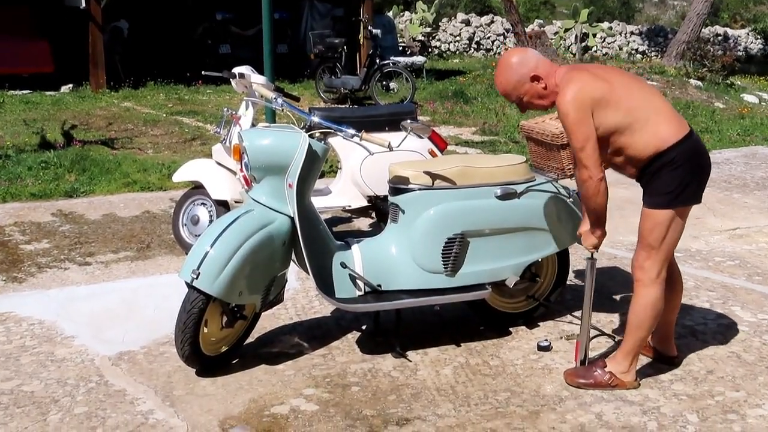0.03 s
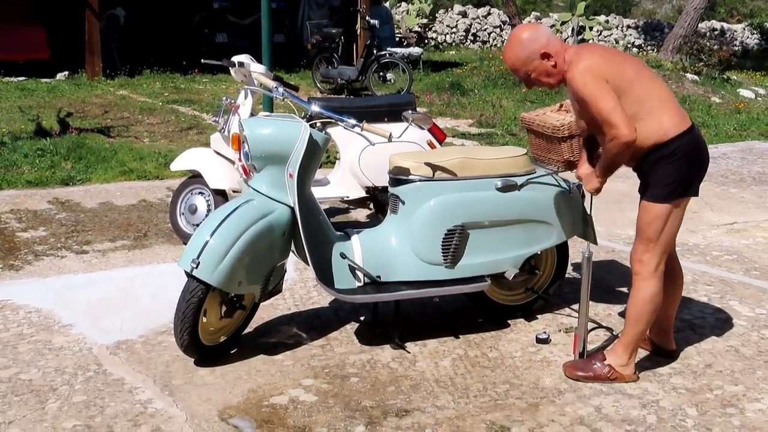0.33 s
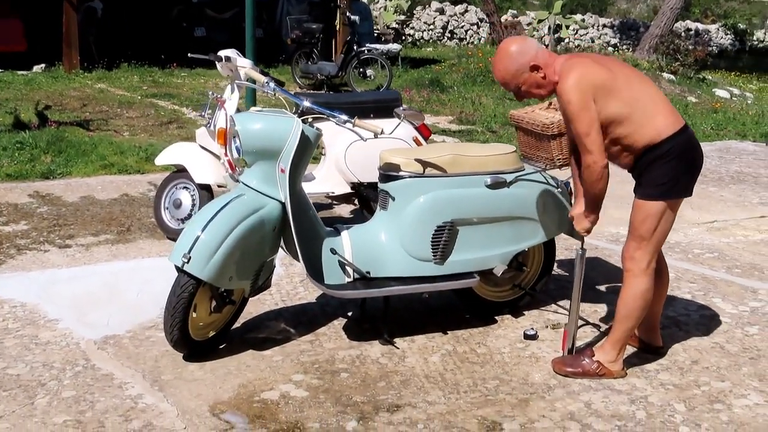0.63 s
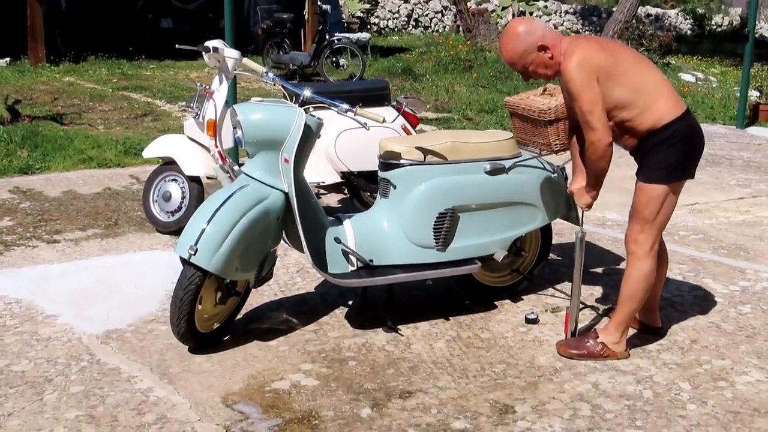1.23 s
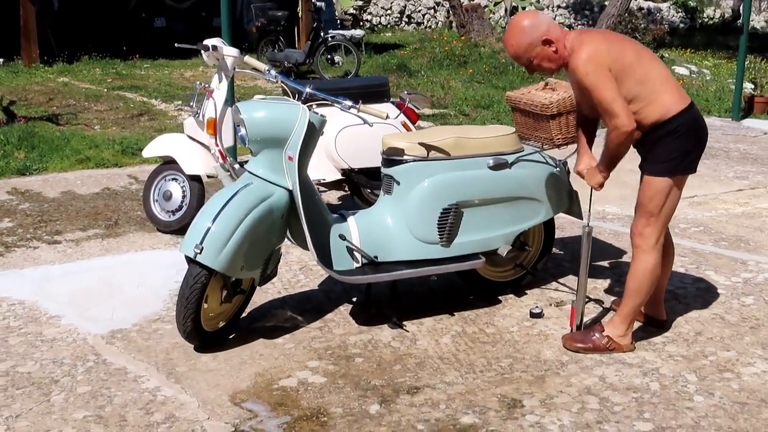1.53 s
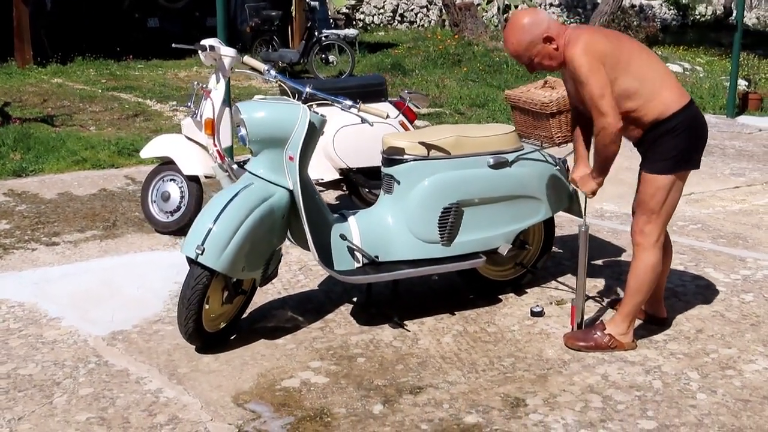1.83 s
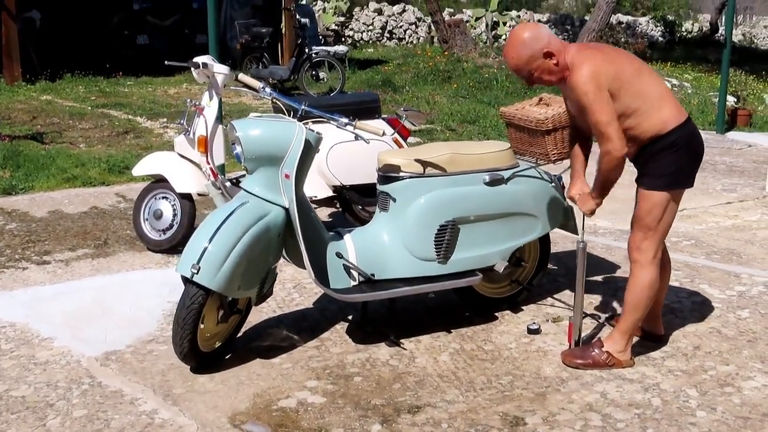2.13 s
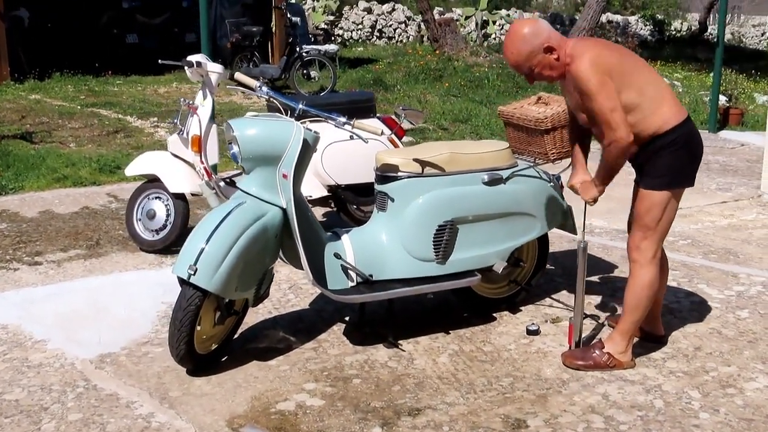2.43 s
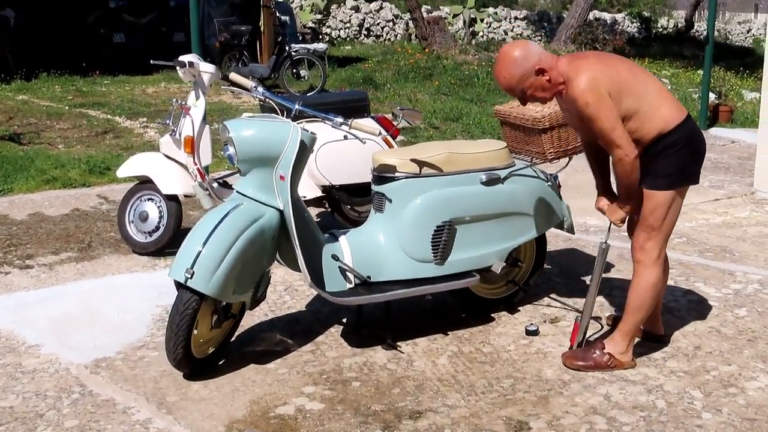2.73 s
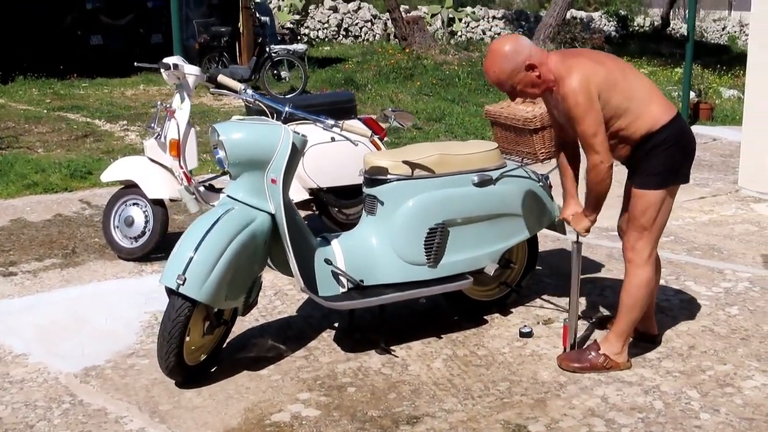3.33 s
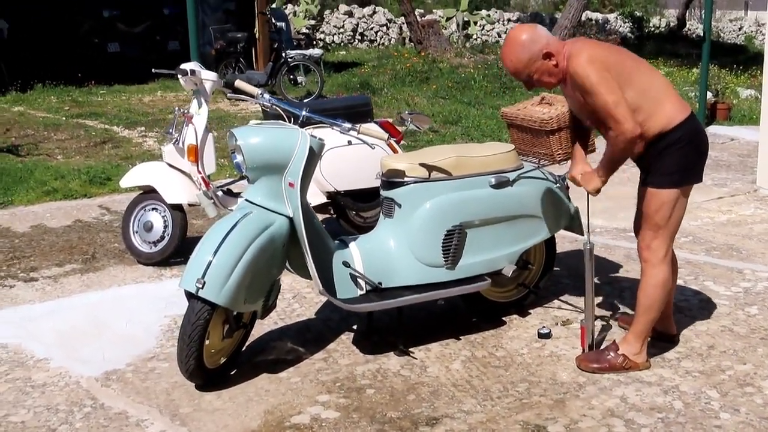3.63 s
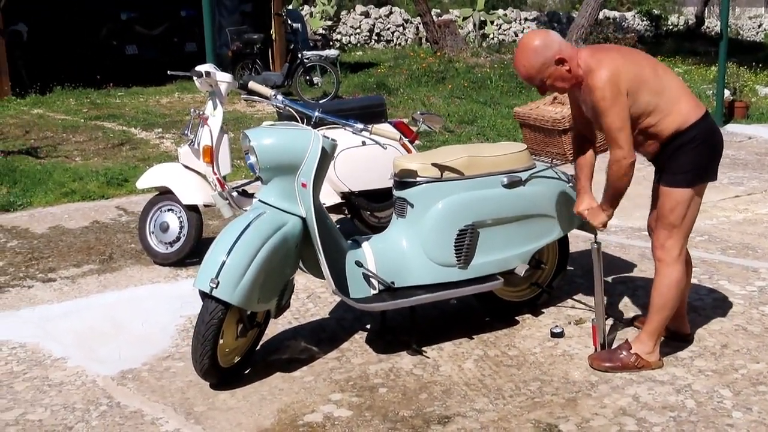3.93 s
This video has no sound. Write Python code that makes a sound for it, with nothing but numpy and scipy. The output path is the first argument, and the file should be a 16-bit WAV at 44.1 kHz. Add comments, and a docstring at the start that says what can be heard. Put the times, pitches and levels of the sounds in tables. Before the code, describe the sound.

A hand pump inflates a scooter tyre in a steady rhythm. Each push hisses with a thin whistle, and each pull sucks and rasps, with squeaks and knocks between. Light wind brushes the microphone in an open yard.

```python
"""An open yard: a floor pump inflates a scooter tyre at about one and a half strokes a second.
As the handle sinks, air is forced out with a hiss and a thin wavering whistle, and a bright spurt ends
the push. As it rises, air rushes in and the rod rasps. The washer chirps and squeaks on the barrel wall,
and the loose rod knocks at the turns. Light wind buffets the microphone over a faint outdoor hiss."""
import sys
import numpy as np
from scipy import signal
from scipy.fft import rfft, irfft
from scipy.io import wavfile
from scipy.ndimage import uniform_filter1d

SR = 44100
rng = np.random.default_rng(int(sys.argv[2]) if len(sys.argv) > 2 else 0)


def output_pcm(signal):
    """Save a mono or channel-first signal as 16-bit PCM at the path in sys.argv[1].

    Samples are clipped to [-1, 1] before scaling.
    """
    pcm = np.clip(np.atleast_2d(signal).T, -1, 1) * 32767
    wavfile.write(sys.argv[1], SR, np.round(pcm).astype(np.int16))


N = 176400
TIME = np.arange(N) / SR
FREQS = np.maximum(np.fft.rfftfreq(N, 1 / SR), 1)

# Handle sinks: t/s at start, fastest, end; rush level/dB at each; hiss level/dB; whistle re rush/dB
DOWNSTROKES = [(-.05, 0.03, 0.14, -39, -34, -40, -41, -6), (0.57, 0.743, 0.76, -37, -37, -32, -42, -8.5),
               (1.159, 1.268, 1.367, -42.5, -34.5, -34, -43.5, -12),
               (1.777, 1.92, 2.09, -35.5, -27.5, -51.5, -43, -18),
               (2.445, 2.55, 2.657, -31.5, -29.5, -40, -38.5, -22),
               (3.051, 3.147, 3.38, -36.5, -32.5, -53, -43, -11),
               (3.659, 3.777, 3.83, -34, -35, -39, -49.5, -2.5)]
# Handle rises: t/s at start, fastest, end; rush level/dB at each; rasp level/dB
UPSTROKES = [(0.305, 0.418, 0.46, -41, -32, -40.5, -40.5), (0.916, 1.029, 1.033, -37, -34, -28.5, -44.5),
             (1.551, 1.591, 1.665, -37, -31.5, -32.5, -47), (2.158, 2.264, 2.36, -39.5, -34, -60, -40.5),
             (2.77, 2.848, 2.956, -48, -31.5, -37.5, -55), (3.465, 3.524, 3.63, -30.5, -30.5, -44, -44.5)]
# Short jets at the valve: t/s, length/s (held for half of it), level/dB
VALVE_SPURTS = [(0.167, 0.02, -32), (0.787, 0.042, -34), (1.366, 0.17, -39.5), (1.681, 0.032, -34),
                (1.904, 0.046, -35), (2.051, 0.042, -35.5), (2.402, 0.05, -37), (2.66, 0.026, -33.5),
                (2.928, 0.019, -34.5), (3.017, .02, -38), (3.284, 0.036, -33), (3.882, 0.018, -36.5)]
# Clear squeaks of the washer: t/s, length/s, start f/Hz, end f/Hz, level/dB
WASHER_SQUEAKS = [(1.248, 0.026, 2736, 3550, -35), (1.549, 0.017, 3200, 2480, -32),
                  (1.844, 0.014, 3130, 3400, -27), (1.9, 0.028, 2410, 2290, -27),
                  (1.924, 0.067, 3010, 2920, -33.5), (1.976, 0.078, 3450, 3430, -43),
                  (2.515, .022, 2920, 3490, -32), (2.827, 0.029, 3150, 2750, -27.5),
                  (3.111, 0.027, 2760, 3610, -28.5), (3.139, 0.031, 2904, 3275, -28.5),
                  (3.657, 0.042, 2826, 3410, -29.5), (3.714, 0.017, 3050, 3520, -35)]
# Rod hits the barrel: t/s, dry rms level/dB over the first 10 ms, low ring gain/dB, top ring gain/dB
ROD_KNOCKS = [(.231, -27.5, 6.5, 3), (.567, -29.5, -4, 1), (0.867, -29, 7.5, 1), (0.919, -26, -5, 0),
              (1.162, -35, 4, -7), (1.4086, -22, -5, -6), (1.4139, -21, -5, 2), (1.422, -27, 4, 10.5),
              (1.498, -33.5, 5.5, -5), (1.776, -33, -2, -8), (2.051, -28, 4.5, -2),
              (2.147, -27.5, 2.5, 9.5), (2.49, -22.5, -8, -17), (3.295, -19.5, 0, 0.5),
              (3.355, -23, 0.5, 5), (3.471, -27.5, 2.5, 3)]
# The whole pump jolts: t/s, level/dB
PUMP_JOLTS = [(3.284, -33), (3.354, -41)]
# Ringing modes of barrel and rod: f/Hz, level/dB, t60/s
BARREL_MODES = [(467, -19, 0.04), (618, -17, 0.038), (1013, -17, 0.018), (1506, -10.5, 0.028),
                (2383, -4.5, 0.011), (2970, -6.5, 0.0081), (3290, -6, 0.011), (4150, -7.5, 0.0068),
                (4990, -17.5, 0.0095), (6420, -14.5, 0.0035)]
# Narrow resonances of the pump tube: f/Hz
TUBE_RESONANCES = [2180, 2374, 3880, 6330, 6710]
# Wind puffs on the microphone: t/s, length/s, level/dB
WIND_PUFFS = [(1.767, 0.12, -32.5), (1.866, 0.011, -29), (3.115, 0.011, -42), (3.678, 0.0092, -24.5),
              (3.911, 0.011, -23.5)]
# Rise and fall of the wind rumble: t/s, level/dB
BREEZE_LEVELS = [(0, -52.5), (.42, -46.5), (.68, -70), (.95, -46), (1.25, -61), (1.55, -51), (2.5, -53),
                 (2.78, -59.5), (3.1, -47.5), (3.3, -50.5), (4, -43)]

# Colour of the downstroke rush: f/Hz, level/dB
PUSH_COLOUR = [(200, -26), (600, -17), (1300, -10.5), (1750, -6.5), (2250, -3), (2650, -6), (3000, 0.5),
               (3500, -6), (3900, -5), (5500, -12), (15000, -27.5)]
# Hollow colour of the intake: f/Hz, level/dB
PULL_COLOUR = [(250, -19.5), (800, -19), (1080, -1.5), (1300, -16), (1530, -5), (2200, -2), (2600, -3),
               (3200, 1), (3650, -7), (4350, -4.5), (7500, -17.5), (15000, -30.5)]
# Peaky colour of the hose hiss: f/Hz, level/dB
HOSE_COLOUR = [(1500, -4), (4500, -13), (5800, 1), (6500, 16.5), (7300, -12), (8300, -9), (9700, 6),
               (12000, -10), (14500, 0), (16000, -25)]
# Bright colour of valve jets and rod rasp: f/Hz, level/dB
BRIGHT_COLOUR = [(400, 2.5), (1500, 7), (3300, 4), (6300, 12.5), (7500, 0.5), (9800, 6.5), (12000, 0.5),
                 (15000, -1)]
# Deep colour of the wind rumble: f/Hz, level/dB
RUMBLE_COLOUR = [(20, -31), (55, -3), (130, 1.5), (300, -12), (1500, -53)]
# Dull colour of the wind puffs: f/Hz, level/dB
PUFF_COLOUR = [(20, -24), (160, 2.5), (320, -3), (520, -17.5), (1500, -81)]
# Soft colour of the outdoor hiss: f/Hz, level/dB
YARD_COLOUR = [(100, -11.5), (680, 6), (1400, -0.5), (2400, 0), (4800, -8.5), (6600, -11.5), (15000, -18.5)]
# How alike the two microphones sound: f/Hz, correlation
STEREO_LIKENESS = [(150, .999), (600, .985), (2500, .96), (4400, .89), (6500, .5), (15000, .57)]
# Where the image leans left: f/Hz, share of the full lean
LEFT_LEAN = [(1000, 0), (2800, .3), (5300, 1.0), (9000, .22)]

ATTACK_S, RELEASE_DB_PER_S = 0.0027, 368
TREBLE_FLICKER_DB = 5.5  # depth of a random, watery flicker of narrow bands in the high hiss


def pushes(hiss_follows=0.13, chirp_db=-3):
    """Each downstroke drives a rush with rising chirps in the barrel, a hose hiss and the whistle."""
    rush_gain = hiss_gain = whistle_gain = 0
    for start, fastest, end, start_db, fastest_db, end_db, hiss_db, whistle_db in DOWNSTROKES:
        flow = stroke([start, fastest, end], [start_db, fastest_db, end_db])
        rush_gain += flow
        whistle_gain += flow * from_db(whistle_db)
        flattened_flow = (flow / from_db(fastest_db)) ** hiss_follows
        hiss_gain += from_db(hiss_db) * flattened_flow * gate(start, end)
    breath = band_flicker(air(PUSH_COLOUR))
    barrel = rms_one(breath + from_db(chirp_db) * chirps(PUSH_COLOUR, sweep_hz_per_s=11000))
    rush = rush_gain * rubbing() * barrel
    hiss = hiss_gain * sputter() * band_flicker(air(HOSE_COLOUR), TREBLE_FLICKER_DB)
    return tube(rush + hiss) + whistle_gain * whistle()


def whistle(centre_hz=3154, waver_hz=205.6, wavers_per_s=23, unsteady=.3, flicker_db=4, jitter_hz=55):
    """A breathy tone that wavers as the valve flutters, loudest on each upward glide."""
    flutter = phase(wavers_per_s * (1 + unsteady * drift(15)))
    hz = centre_hz + waver_hz * np.sin(flutter) + jitter_hz * (drift(13) + 2 * drift(950))
    flicker = from_db(flicker_db * (drift(wavers_per_s) + np.cos(flutter)))
    return rms_one(flicker * np.sin(phase(hz)))


def pulls(chirp_db=-5):
    """Each upstroke sucks air past the washer into the hollow barrel, with falling chirps."""
    breath = band_flicker(air(PULL_COLOUR))
    barrel = rms_one(breath + from_db(chirp_db) * chirps(PULL_COLOUR, sweep_hz_per_s=-4000))
    flow = sum(stroke([start, fastest, end], levels) for start, fastest, end, *levels, _ in UPSTROKES)
    return flow * rubbing() * tube(barrel)


def stroke(times, levels_db):
    """Air flow follows the handle through a stroke, then shuts off."""
    return from_db(np.interp(TIME, times, levels_db)) * gate(times[0], times[-1])


def tube(x, width_hz=41, boost_db=8):
    """Air moving through the pump picks up its narrow resonances."""
    peaks = sum(1 / (1 + (2 * (FREQS - hz) / width_hz) ** 2) for hz in TUBE_RESONANCES)
    return irfft(rfft(x) * from_db(boost_db * peaks), N)


def spurts():
    """Bright jets escape at the valve."""
    gain = sum(from_db(db) * gate(s, s + length / 2, fall_db_per_s=471)
               for s, length, db in VALVE_SPURTS)
    return gain * sputter() * band_flicker(air(BRIGHT_COLOUR), TREBLE_FLICKER_DB)


def sputter(depth_db=2.0):
    """The fast, uneven flicker of escaping air."""
    return rms_one(from_db(depth_db * drift(107)))


def knocks(chatter_per_s=1500, chatter_db=-12, chatter_t60_s=0.093, crack_db=-9,
           low_ring_hz=1800, top_ring_hz=4600, spread_db=2.5, detune=0.032):
    """The loose rod hits with a crack and a dying chatter; the barrel never rings quite the same way."""
    out, t = np.zeros(N + SR), TIME[:SR // 6]
    for s, db, low_db, top_db in ROD_KNOCKS:
        touches = rng.standard_normal(len(t)) * (rng.random(len(t)) < chatter_per_s / SR)
        chatter = touches * from_db(chatter_db - 60 * t / chatter_t60_s)
        contact = chatter + (t == 0)
        knock = from_db(top_db + crack_db) * contact
        for k, (hz, mode_db, t60) in enumerate(BARREL_MODES):
            tilt_db = low_db * (hz < low_ring_hz) + top_db * (hz > top_ring_hz)
            strength = from_db(mode_db + tilt_db + spread_db * rng.standard_normal())
            drive = chatter if hz < low_ring_hz else contact  # only the chatter stirs the low modes
            knock += (-1) ** k * strength * ring(drive, hz * (1 + detune * rng.standard_normal()), t60)
        i = int(s * SR)
        out[i:i + len(t)] += from_db(db) * knock / np.std(knock[:SR // 100])
    return out[:N]


def thuds(hold_s=0.017):
    """The hardest turns shake the whole pump in its lowest mode."""
    hz, _, t60 = BARREL_MODES[0]
    body = compress(ring(rng.standard_normal(N), hz, t60))
    return body * sum(from_db(db) * gate(s, s + hold_s) for s, db in PUMP_JOLTS)


def squeaks():
    """Now and then one squeak of the washer stands clear."""
    out = np.zeros(N + SR)
    for s, length, start_hz, end_hz, db in WASHER_SQUEAKS:
        tone, i = glide(length, start_hz, end_hz), int(s * SR)
        out[i:i + len(tone)] += from_db(db) * tone
    return out[:N] * rubbing()


def chirps(colour, sweep_hz_per_s, per_s=190, mean_length_s=0.03, low_hz=1475, high_hz=4547):
    """The washer sticks and slips on the barrel wall: a swarm of tiny gliding squeaks."""
    out, tint_db = np.zeros(N + SR), per_hz(colour)
    for when, pitch, slope, size in rng.random((int(per_s * N / SR), 4)):
        hz = low_hz * (high_hz / low_hz) ** pitch
        length = mean_length_s * (.5 + size)
        grain = glide(length, hz, hz + 2 * slope * sweep_hz_per_s * length)
        i = int(when * N)
        out[i:i + len(grain)] += grain * size * from_db(np.interp(hz, FREQS, tint_db))
    return rms_one(out[:N])


def glide(length, start_hz, end_hz):
    """One gliding squeak with rounded ends."""
    progress = np.linspace(0, 1, max(int(length * SR), 2))
    envelope = np.sqrt(2 * np.abs(np.sin(np.pi * progress)))
    return envelope * np.sin(phase(start_hz + (end_hz - start_hz) * progress))


def rubbing(depth_db=1.5):
    """The washer drags unevenly, so the level lurches."""
    return rms_one(from_db(depth_db * drift(46)))


def rasps(swell_s=0.039, low_cut_hz=4300,
          stutter_delay_s=0.059, stutter_s=0.065, stutter_per_s=37, stutter_db=-45, depth_db=5.5):
    """The rising rod scrapes brightly at full speed, then stutters as it slows towards the top."""
    judder = np.sin(phase(stutter_per_s * (1 + .5 * drift(21.14))))
    stutter = from_db(stutter_db) * rms_one(from_db(depth_db * judder))
    gain = 0
    for _, fastest, *_, rasp_db in UPSTROKES:
        slowing = fastest + stutter_delay_s
        gain += from_db(rasp_db) * np.exp(-((TIME - fastest) / swell_s) ** 2)
        gain += stutter * gate(slowing, slowing + stutter_s)
    gain *= sputter()
    low_cut = signal.butter(2, low_cut_hz, "high", fs=SR, output="sos")
    scrape = signal.sosfilt(low_cut, band_flicker(air(BRIGHT_COLOUR), TREBLE_FLICKER_DB))
    return gain * rms_one(scrape)


def yard_echo(x, echo_db=-10.5, t60_s=0.25, predelay_s=.004):
    """The direct sound plus a brief scatter off the ground, scooters and walls."""
    t = TIME[:SR // 3]
    tails = rng.standard_normal((2, len(t))) * from_db(-60 * t / t60_s) * (t > predelay_s)
    mid, side = [signal.fftconvolve(x, tail / np.linalg.norm(tail))[:N] for tail in tails]
    return stereo(x + from_db(echo_db) * mid, 2 * from_db(echo_db) * side)


def wind(lumpy_db=4.5):
    """Wind buffets the microphones: lumpy rumble and sudden puffs."""
    breeze = from_db(np.interp(TIME, *np.transpose(BREEZE_LEVELS)))
    lumps = rms_one(from_db(lumpy_db * drift(19.6)))
    puffs = sum(from_db(db) * gate(s, s + length, fall_db_per_s=900) for s, length, db in WIND_PUFFS)
    eddies = compress(air(PUFF_COLOUR), knee=.5)
    return breeze * lumps * air(RUMBLE_COLOUR) + puffs * eddies


def yard_hiss(level_db=-46.5):
    """A faint bed of outdoor air."""
    return from_db(level_db) * band_flicker(air(YARD_COLOUR))


def air(colour):
    """Coloured noise at both microphones."""
    gain = from_db(per_hz(colour))
    return stereo(noise(gain), noise(gain))


def band_flicker(x, depth_db=3.5):
    """Narrow bands of the noise swell and fade at random."""
    cells = signal.stft(x, nperseg=512)[2]
    swell = uniform_filter1d(rng.standard_normal(cells.shape[1:]), size=3, axis=0)  # across bands
    swell = uniform_filter1d(swell, size=7, axis=1)  # across time
    flickering = signal.istft(cells * from_db(depth_db * rms_one(swell)))[1]
    return rms_one(flickering[:, :N])


def stereo(mid, side, left_db=2.2, left_lag_rad=.6):
    """Two microphones: alike in the bass, wider in the treble, where the left is louder and late."""
    alike = np.clip(per_hz(STEREO_LIKENESS), 0, 1)
    sign = np.array([[1], [-1]])
    pair = np.sqrt((1 + alike) / 2) * rfft(mid) + sign * np.sqrt((1 - alike) / 2) * rfft(side)
    lean = sign * per_hz(LEFT_LEAN) / 2
    return irfft(pair * from_db(lean * left_db) * np.exp(-1j * lean * left_lag_rad), N)


def ring(clicks, hz, t60):
    """A unit click sets a sine of height 1 ringing."""
    decay, step = from_db(-60 / (t60 * SR)), 2 * np.pi * hz / SR
    return signal.lfilter([0, np.sin(step)], [1, -2 * decay * np.cos(step), decay ** 2], clicks + 1e-18)


def compress(x, knee=0):
    """Squeeze the envelope 2:1 above the knee for a denser body at unit rms."""
    return rms_one(x / np.sqrt(np.abs(signal.hilbert(x)) + knee))


def gate(start, end, fall_db_per_s=RELEASE_DB_PER_S):
    """Quick attack, hold, steady release."""
    attack = np.clip((TIME - start) / ATTACK_S, 0, 1)
    return attack * from_db(-np.clip((TIME - end) * fall_db_per_s, 0, 200))


def drift(rate_hz):
    """Random wander at unit rms, smoothed above the given rate."""
    return noise(1 / (1 + (FREQS / rate_hz) ** 2))


def noise(gain):
    """Unit-rms noise shaped by a gain at each frequency."""
    return rms_one(irfft(rfft(rng.standard_normal(N)) * gain, N))


def per_hz(points):
    """Draw a curve through the points on a log-frequency axis."""
    hz, value = np.transpose(points)
    return np.interp(np.log(FREQS), np.log(hz), value)


def phase(hz):
    """Running phase of a moving pitch, in radians."""
    return 2 * np.pi * np.cumsum(hz) / SR


def from_db(db):
    """Decibels to gain."""
    return 10 ** (np.asarray(db) / 20)


def rms_one(x):
    """Scale to unit rms."""
    return x / np.sqrt(np.mean(x ** 2) + 1e-20)


def scene():
    """The pump up front, wind and the quiet yard behind."""
    strokes = pushes() + pulls() + rasps() + squeaks() + spurts()
    return strokes + yard_echo(knocks() + thuds()) + wind() + yard_hiss()


def record(dry, cutoff_hz=16100):
    """A steep high cut takes off the very top."""
    return irfft(rfft(dry) / np.sqrt(1 + (FREQS / cutoff_hz) ** 200), N)


dry = scene()
out = record(dry)
output_pcm(out)
```